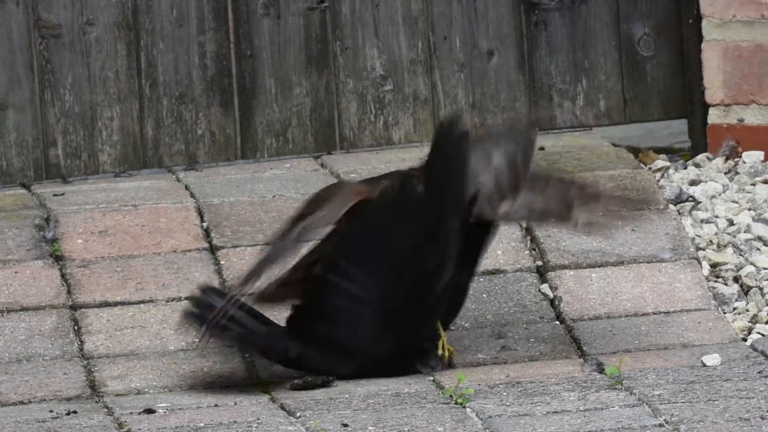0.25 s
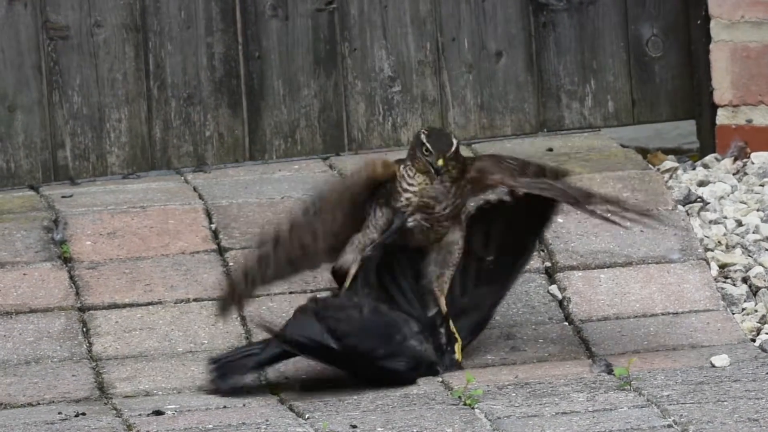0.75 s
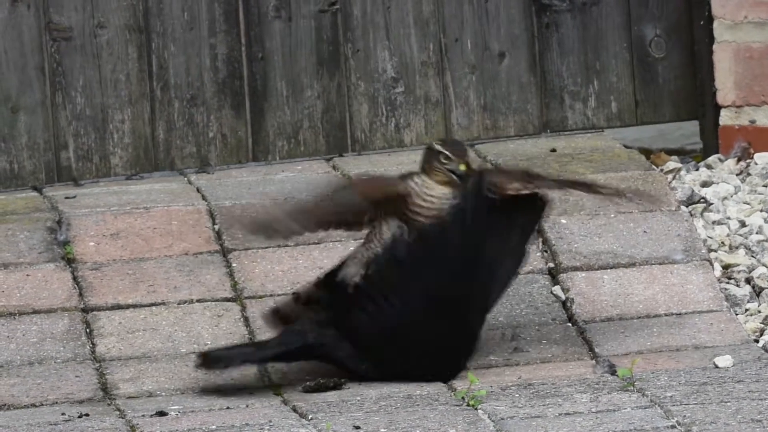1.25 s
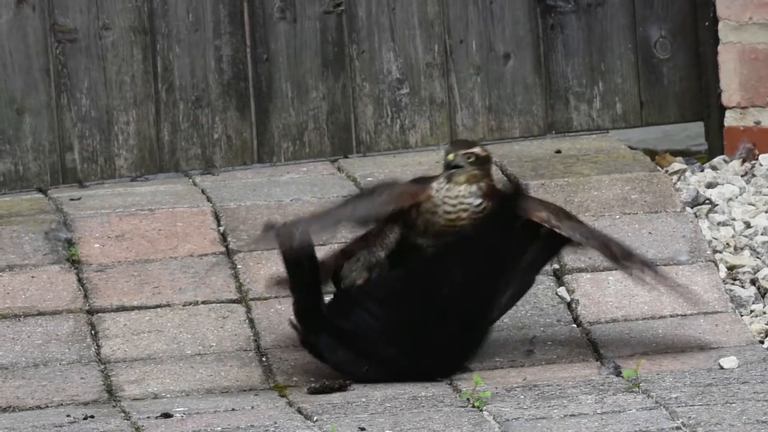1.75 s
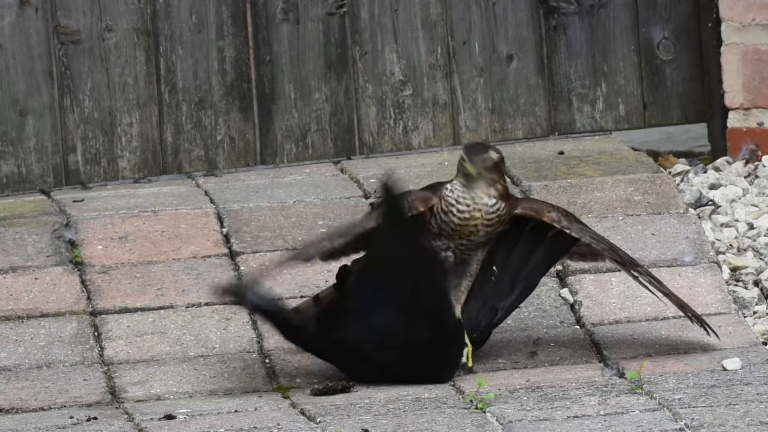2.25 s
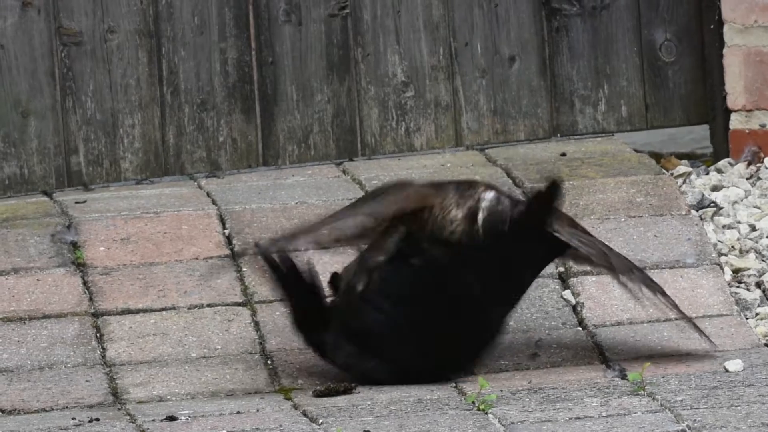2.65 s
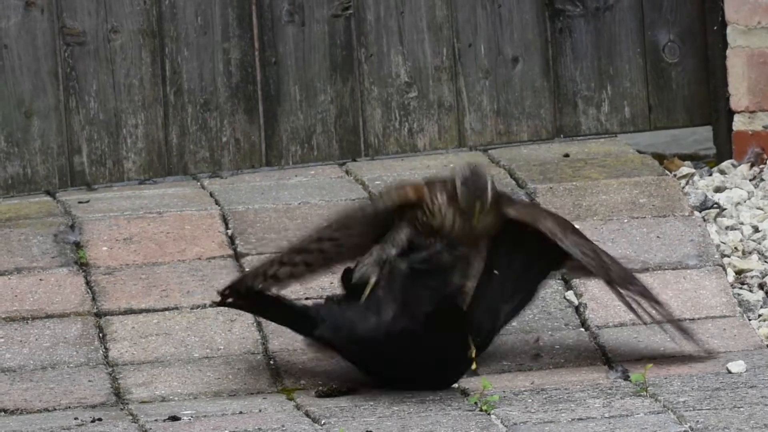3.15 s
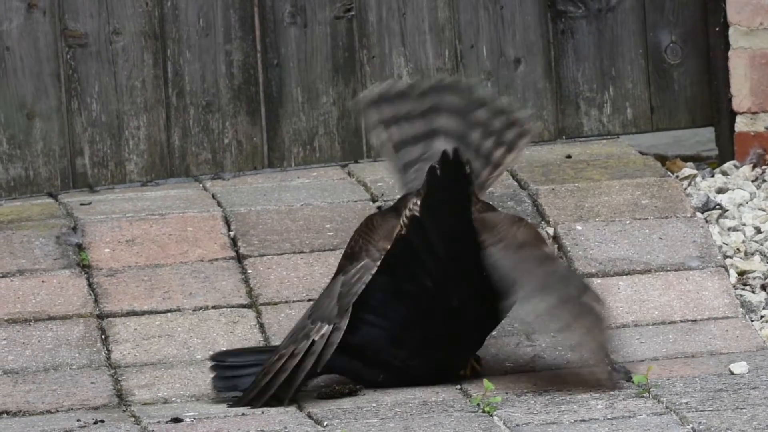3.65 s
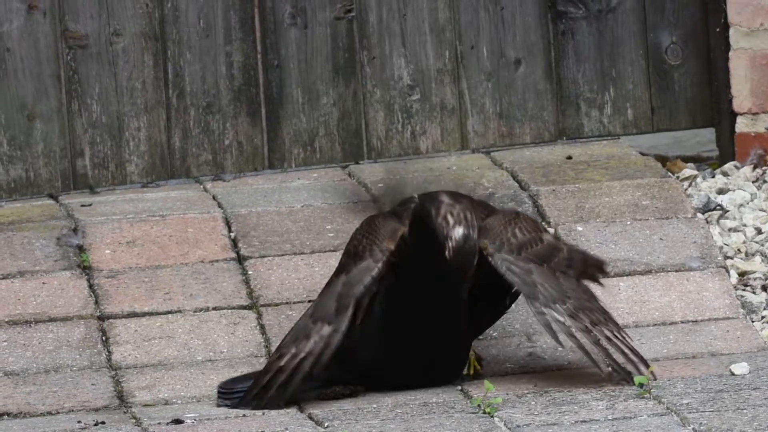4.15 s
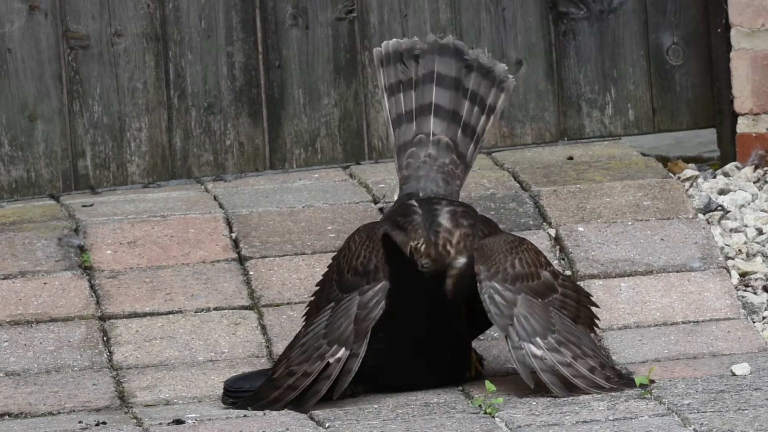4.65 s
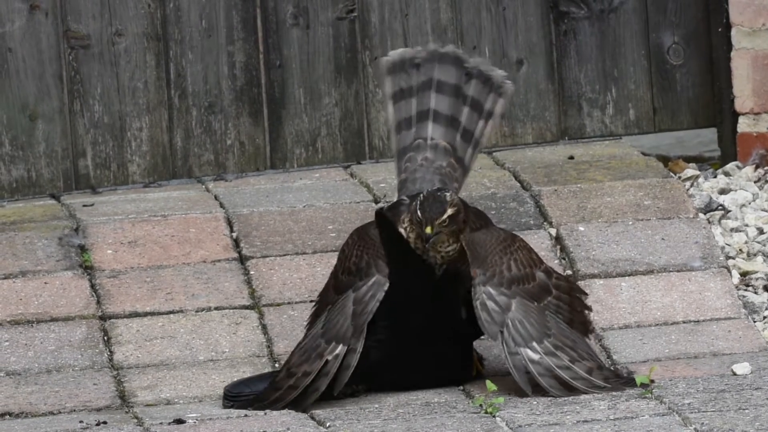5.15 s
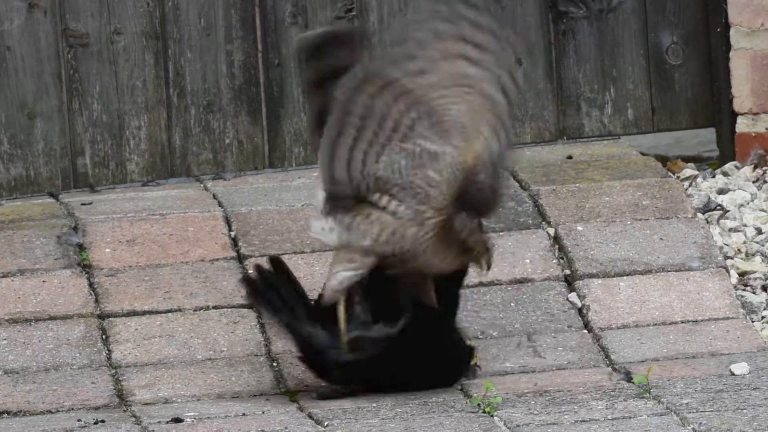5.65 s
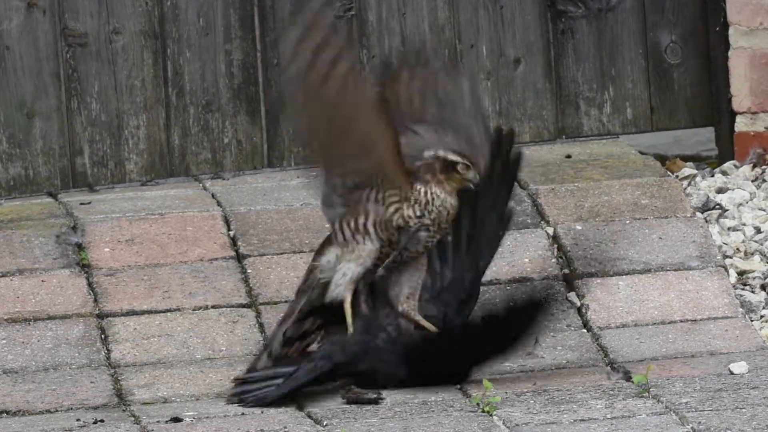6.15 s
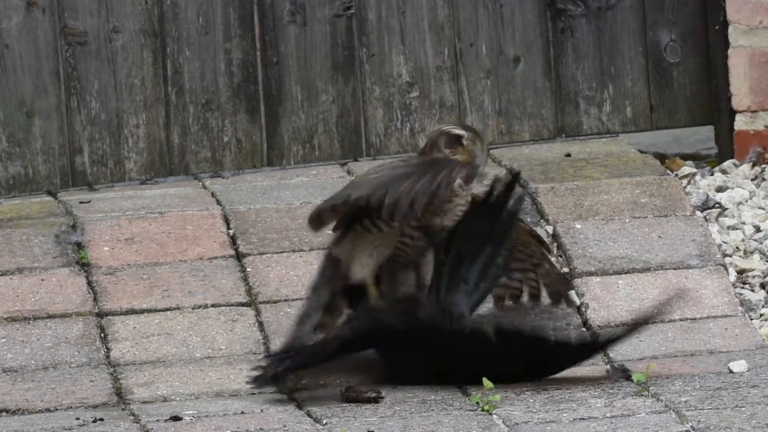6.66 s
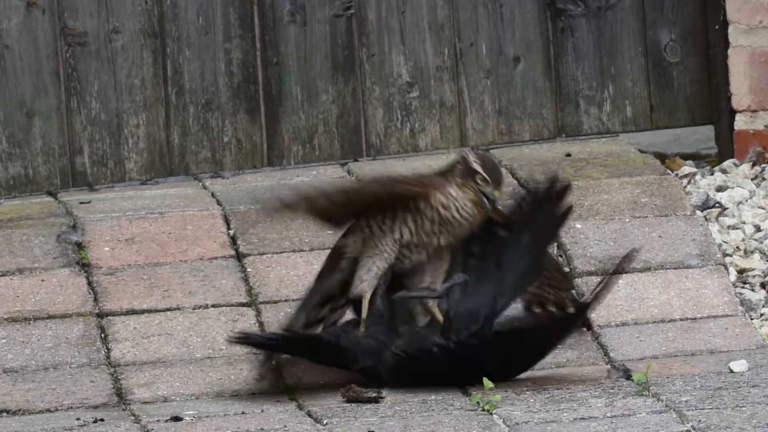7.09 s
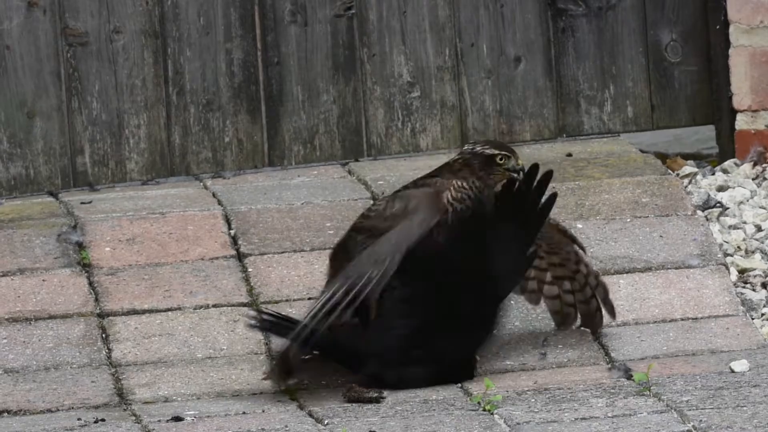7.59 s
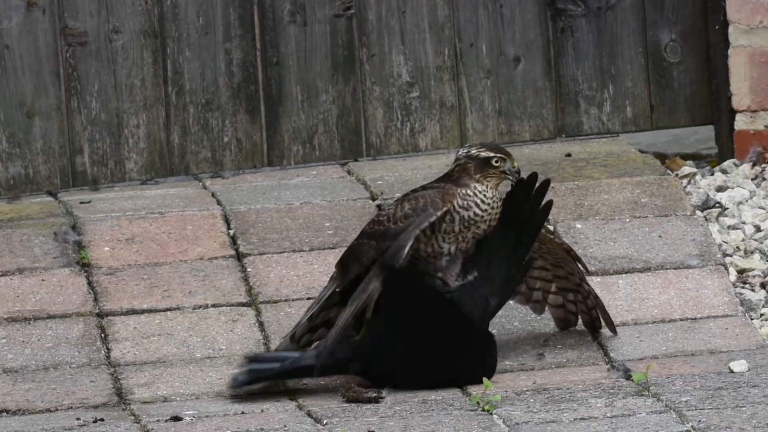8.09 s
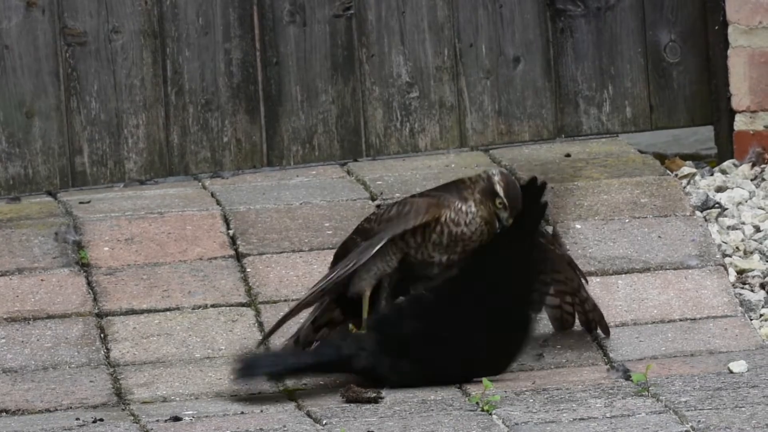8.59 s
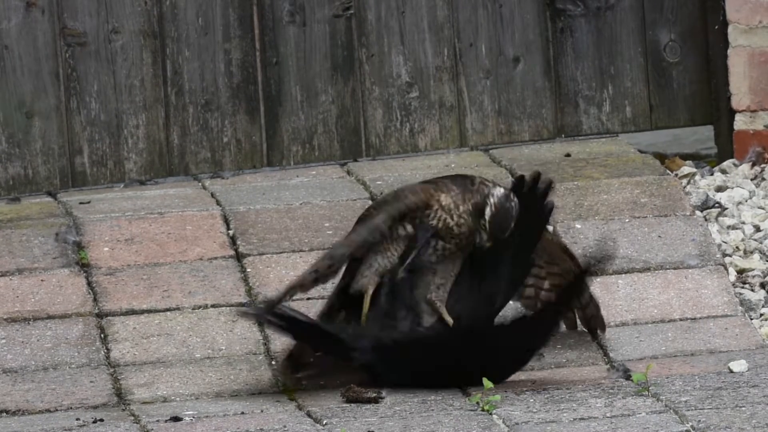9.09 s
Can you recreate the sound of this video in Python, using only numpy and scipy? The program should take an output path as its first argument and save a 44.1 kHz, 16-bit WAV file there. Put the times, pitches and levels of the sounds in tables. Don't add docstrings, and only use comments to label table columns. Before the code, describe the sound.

Hoarse, raspy bird screams repeat about twice a second with hard short echoes, over soft wing beats, faint claw ticks and low town hum.

```python
import sys
import numpy as np
from scipy import signal
from scipy.io import wavfile
from scipy.ndimage import uniform_filter1d

SR = 44100
rng = np.random.default_rng(int(sys.argv[2]) if len(sys.argv) > 2 else 0)


def to_linear_factor(level_db):
    exponent = np.asarray(level_db, float) / 20
    return 10 ** exponent


def generate_wav(signal):
    frames = np.transpose(np.atleast_2d(signal))
    scaled = np.clip(frames, -1, 1) * 32767
    pcm = np.round(scaled).astype(np.int16)
    wavfile.write(sys.argv[1], SR, pcm)


N = 411453

# (start [s], length [s], peak effort [dB], swell up to the peak [dB], open-beak brightness [dB])
CAWS = [(-.2, .22, -25, 6, -13), (.212, 0.23, -24.5, 3.5, -19), (.662, 0.23, -25, 5.5, -13),
        (1.125, 0.23, -24.5, 7, -22), (1.577, 0.24, -26.5, 2.5, -21), (2.079, 0.17, -28, 4, -28.5),
        (2.672, 0.251, -22.5, 7.5, -19), (3.172, 0.23, -21.5, 10.5, -18), (3.707, 0.17, -30, 0.5, -22),
        (4.11, 0.24, -25.5, 6.5, -19.5), (4.643, 0.17, -29, 13.5, -20.5), (5.057, 0.21, -26.5, 9.5, -17.5),
        (5.562, 0.23, -25, 7, -18.5), (5.979, 0.2346, -23.5, 7.5, -15.5), (6.439, .19, -27.5, 2, -25.5),
        (6.818, 0.24, -28, 1, -15), (7.265, 0.1976, -26, 5, -16.5), (7.707, .19, -27, 10, -21),
        (8.616, 0.13, -30, 4, -26), (8.943, 0.22, -24.5, 8.5, -19.5)]
# (hoarse rate [Hz], steady rate [Hz], steadies after [s], roughness then [0-1])
VOICE = [(350, 350, .1, .7), (315, 325, .14, .55), (360, 344, .13, .4), (330, 320, .13, .35),
         (298, 317, .16, .2), (288, 288, .12, .85), (348, 348, .13, .25), (288, 352, .1, .2),
         (288, 288, .1, .95), (300, 314, .16, .4), (285, 289, .1, .9), (288, 310, .155, .4),
         (300, 320, .125, .25), (282, 350, .1, .45), (302, 292, .15, .6), (295, 315, .05, .3),
         (285, 308, .11, .4), (290, 284, .15, .55), (350, 344, .06, .74), (286, 305, .135, .25)]
# (first [Hz], last [Hz])
GAPE = [(5000, 5050), (4840, 4620), (4640, 5100), (4930, 4720), (4800, 4370), (4700, 4725), (4920, 4450),
        (4560, 4790), (4848, 4500), (4520, 4600), (4424, 4460), (4377, 4620), (4010, 5100), (4614, 4600),
        (4620, 4660), (4670, 5150), (4650, 5100), (4620, 4780), (4610, 4800), (4560, 4760)]
# (frequency [Hz], width [Hz], level [dB], share of the beak brightness [0-1])
PIPE = [(940.5, 144, -4, 0.1), (1113.5, 45, -4, 0.09), (1331, 280, -4, 0.1), (1584, 82, -7, 0.02),
        (1743, 120, -6.5, 0), (2031, 250, 1.94, 0.31), (2361, 380, -4.5, 0.31), (3238, 1400, 3.5, 1.06)]
# (frequency [Hz], width [Hz], level [dB])
CHEST = (657.5, 230, -3.5)
# (factor on the beak resonance [1], width [Hz], level [dB], share of brightness [1], share of effort [1])
BEAK = [(1.001, 403, -1.5, 0.72, 0), (1.22, 1700, 8.5, 1.256, 1.9), (1.502, 595, -2, 1.1, 0.077),
        (2.0, 1300, -2.5, 1.12, 1.2), (2.8, 901.6, -10, 1.9, 1.8)]
# (frequency [Hz], time to fall 60 dB [s])
YARD_DECAY = [(400, 0.15), (1100, 0.18), (2000, 0.21), (4000, 0.15), (9000, 0.113)]
# (frequency [Hz], left-right likeness [1])
YARD_SAME = [(500, 1.05), (800, 1.0), (1400, .96), (5000, 0.806), (10000, 0.3)]
# (frequency [Hz], level per Hz [dB])
HUM = [(18, -57), (30, -34.5), (80, -48), (114, -13), (144, -31.5), (304, -29), (354, -17.5), (747, -24),
       (1310, -18), (2140, -26), (3070, -26), (4520, -27.5), (14000, -33.5)]
# (frequency [Hz], left-right likeness [1])
HUM_SAME = [(60, 0.9), (230, 0.77), (900, 0.74), (3500, 0.12), (13600, 0.01)]
# (time [s], level [dB])
ENGINE = [(0.0, -80.5), (0.31, -58), (1.01, -85.5), (1.17, -60), (1.45, -92.5), (2.41, -75.5),
          (3.009, -97.5), (3.14, -80), (4.551, -80.5), (4.78, -74), (5.19, -83.5), (7.22, -82.5),
          (7.38, -85), (9.33, -82.5)]
# (frequency [Hz], level re the drone [dB])
DRONE = [(116, -5.5), (226, 0.5)]
# (time [s], pitch [Hz], level [dB])
HIGH_COOS = [
    [(.15, 440, -88), (.186, 421, -29), (.214, 458, -27.5), (.45, 429.9, -29.5), (.48, 434, -38),
     (.53, 449, -22.5), (.59, 423.3, -38), (.63, 452.8, -27.5), (.72, 430, -52)],
    [(1.09, 366, -62), (1.128, 395, -31.5), (1.155, 455, -28.5), (1.19, 456.7, -31.5), (1.215, 421, -39),
     (1.245, 450, -37), (1.31, 445, -32), (1.38, 427, -75.5)],
]
# (time [s], pitch [Hz], level [dB])
LOW_COOS = [
    [(.56, 408, -34), (.6, 393.5, -34.5), (.7, 376, -30.5), (.74, 343, -43), (.76, 319, -37.5),
     (.81, 355, -41.5), (.89, 326, -56), (.93, 326, -75)],
    [(1.19, 406, -46), (1.215, 397, -36), (1.3, 402, -46.5), (1.36, 370, -67)],
]
# (time [s], peak [dB], ring [Hz], length [s])
TICKS = [
    (2.052, -44, 11100, 0.0038),
    (7.574, -58, 3052, 0.0067),
    (7.759, -52, 10720, 0.0056),
    (9.300, -57, 3890, 0.00716),
]
# (time [s], level [dB], centre [Hz])
FAR_CALLS = [
    [(2.25, -47, 1201), (2.36, -54.5, 1280), (2.47, -51, 1340), (2.57, -59, 1400), (2.7, -70, 1300)],
    [(7.93, -51, 1410), (7.97, -56.5, 1330), (8.15, -90, 1244)],
    [(8.3, -92, 1290), (8.334, -79, 1260), (8.448, -76.5, 1260), (8.58, -92, 1240)],
]

ATTACK_S, ATTACK_DB, EASE_S, EASE_DB, RELEASE_S, RELEASE_DB = 0.018, -11.5, 0.057, -5, 0.04, -44
HOARSE, HOARSE_END, SETTLE_S, GLIDE_S, SAG_S, SAG = 0.92, 0.9, 0.03, 0.045, 0.065, 0.12
OPEN_S, SHUT_DB, AJAR_DB, EASED_DB, CLOSING_DB = 0.1027, -36, -12.5, 0.5, -24.5
GAPE_FROM, GAPE_TO = 0.26, 0.75
CHEST_START_DB, CHEST_HELD_DB, CHEST_TOP_DB, CHEST_END_DB, CHEST_PER_EFFORT = -12, -22, -15, -12, -1.0
FULL_STRAIN_DB = -24.5
HUM_DB = -72.5


def evened(x):
    return x / np.sqrt(np.mean(x ** 2) + 1e-20)


def read(points, hz):
    f, value = np.transpose(points)
    return np.interp(np.log(hz + 1), np.log(f + 1), value)


def add(mix, s, sound):
    sound = sound[max(-round(s * SR), 0):]
    part = mix[max(round(s * SR), 0):][:len(sound)]
    part += sound[:len(part)]


def played(rows):
    s, *columns = np.transpose(rows)
    t = np.arange(s[0], s[-1], 1 / SR)
    return s[0], [np.interp(t, s, column) for column in columns]


def steep(x, hz, width):
    r = np.exp(-np.pi * 1.5 * width / SR)
    if np.ndim(hz) == 0:
        pole = r * np.exp(2j * np.pi * hz / SR)
        rung = signal.lfilter([(1 - r) ** 2], [1, -2 * pole, pole ** 2], x + 1e-18)
    else:
        turn = np.exp(2j * np.pi * np.cumsum(hz) / SR)
        rung = turn * signal.lfilter([(1 - r) ** 2], [1, -2 * r, r * r], x * turn.conj() + 1e-18)
    return 2 * rung.real / np.sqrt(width / 200)


def resonate(x, hz, width):
    return evened(steep(x, hz, width))


def wander(count, per_s):
    b, a = signal.butter(2, per_s, fs=SR / 16)
    slow = signal.lfilter(b, a, rng.standard_normal(count // 16 + 400))[398:]
    return np.interp(np.arange(count) / 16, np.arange(len(slow)), evened(slow))


def pair(frames, same):
    a, b, c, d = rng.standard_normal((frames, len(same), 4)).T
    same = np.clip(same, -1, 1)[:, None]
    left, other = a + 1j * b, c + 1j * d
    return np.array([left, same * left + np.sqrt(1 - same ** 2) * other])


def membrane(hz, rough, jitter, shimmer_db, hiss):
    chaos = np.clip(rough, 0, 1) ** 2
    drift = 0.009 * wander(len(hz), 30)
    uneven = jitter * chaos * np.clip(wander(len(hz), 160), -3, 3)
    turns = np.cumsum(hz * (1 + drift + uneven)) / SR
    limp = (-1) ** np.floor(turns) + 1.1 * rng.standard_normal(len(hz))
    slaps = np.diff(np.floor(turns), prepend=0) * to_linear_factor(shimmer_db * chaos * limp)
    puffs = (0.18 + np.exp(-(turns % 1) / 0.5)) * rng.standard_normal(len(hz))
    leak = 0.15 + hiss * chaos
    return (1 - hiss * chaos) * evened(slaps), evened(puffs) * leak


def gesture(start, length, peak_db, swell_db, open_db):
    held_db = CHEST_HELD_DB + CHEST_PER_EFFORT * (peak_db + 28.5)
    top_db = CHEST_TOP_DB + CHEST_PER_EFFORT * (peak_db + 28)
    low_db = peak_db - swell_db
    opened = min(OPEN_S, length - EASE_S - 0.01)
    climb = (opened - ATTACK_S) / (length - EASE_S - ATTACK_S)
    return [(start, low_db + ATTACK_DB, open_db + SHUT_DB, CHEST_START_DB),
            (start + ATTACK_S, low_db, open_db + AJAR_DB, held_db),
            (start + opened, peak_db - swell_db * (1 - climb), open_db, held_db),
            (start + length - EASE_S, peak_db, open_db, top_db),
            (start + length, peak_db + EASE_DB, open_db + EASED_DB, CHEST_END_DB),
            (start + length + RELEASE_S, peak_db + RELEASE_DB, open_db + CLOSING_DB, CHEST_END_DB)]


def voicing(t, length, hoarse_hz, steady_hz, steady_s, calm):
    sag = np.clip(1 + (t - length) / SAG_S, 0, 1.5)
    glide_hz = np.interp(t, [steady_s - GLIDE_S, steady_s + GLIDE_S], [hoarse_hz, steady_hz])
    rough = np.interp(t, [steady_s - SETTLE_S, steady_s, length - SETTLE_S, length],
                      [HOARSE, calm, calm, max(calm, HOARSE_END)])
    return glide_hz * (1 - SAG * sag ** 2), rough


def caw(push, throat, gape_hz):
    s, (effort_db, bright_db, chest_db) = played(gesture(*push))
    count, length = len(effort_db), push[1]
    t = np.arange(count) / SR
    hz, rough = voicing(t, length, *throat)
    slaps, puffs = membrane(hz, rough, jitter=0.13, shimmer_db=4.0, hiss=0.5)

    chest_hz, chest_width, chest_level_db = CHEST
    voice = to_linear_factor(chest_db + chest_level_db + 12.5) * steep(slaps + puffs, chest_hz, chest_width)
    for k, (f, width, db, share) in enumerate(PIPE):
        sway_db = 2.2 * wander(count, 18)
        level_db = db + share * (bright_db + 4.0) + sway_db
        voice += (-1) ** k * to_linear_factor(level_db) * steep(slaps + puffs, f, width)
    voice = signal.sosfilt(signal.butter(2, 3900, fs=SR, output="sos"), voice)

    beak_hz = np.interp(t, [GAPE_FROM * length, GAPE_TO * length], gape_hz)
    beak_hz = uniform_filter1d(beak_hz, 2500)
    strain_db = np.minimum(effort_db, FULL_STRAIN_DB) + 24.0
    breath = 0.91 * slaps + 2 * puffs
    for factor, width, db, share, strain in BEAK:
        gusts = to_linear_factor(2.33 * wander(count, 14.1))
        level_db = db + share * (bright_db + 4.5) + strain * strain_db
        voice += to_linear_factor(level_db) * gusts * steep(breath, np.minimum(factor * beak_hz, 14000), width)

    flutter = to_linear_factor(1.2 * wander(count, 35))
    onset = np.minimum(1, (t + 0.001) / 0.0029)
    voice *= to_linear_factor(effort_db + 15.0) * flutter * onset
    return s, signal.sosfilt(signal.butter(6, 470, "high", fs=SR, output="sos"), voice)


def yard(x):
    hz, t = np.fft.rfftfreq(256, 1 / SR), np.arange(400) * 64 / SR
    decay_s = np.maximum(read(YARD_DECAY, hz), 0.03)[:, None]
    z = pair(len(t), read(YARD_SAME, hz)) * to_linear_factor(-60 * t / decay_s)
    tail = signal.istft(z, nperseg=256, noverlap=192)[1]
    tail = np.pad(tail, ((0, 0), (130, 0)))
    return signal.fftconvolve(x[None], tail / np.linalg.norm(tail[0]), axes=1)[:, :N]


def rustle(screams):
    struggle = np.sqrt(abs(uniform_filter1d(screams ** 2, 16000)))
    whoosh = resonate(steep(rng.standard_normal(N), 380, 330), 300, 540)
    murmur = resonate(rng.standard_normal(N), 440 + 60 * wander(N, 1.5), 58)
    lumps = to_linear_factor(2.5 * wander(N, 12))
    murmur_level = to_linear_factor(-75.0 + 3.0 * wander(N, 2.7))
    return lumps * (to_linear_factor(-34.5) * struggle * whoosh + murmur_level * murmur)


def town():
    frames, hz = N // 256 + 5, np.fft.rfftfreq(1024, 1 / SR)
    patches = uniform_filter1d(rng.standard_normal((frames, 513)).T, 6, 0)
    patches = evened(uniform_filter1d(patches, 12, 1))
    z = pair(frames, read(HUM_SAME, hz)) * to_linear_factor(read(HUM, hz)[:, None] + 2.0 * patches)
    hum = to_linear_factor(HUM_DB) * evened(signal.istft(z, nperseg=1024, noverlap=768)[1][:, :N])
    engine_db = np.interp(np.arange(N) / SR, *np.transpose(ENGINE))
    drone = sum(to_linear_factor(db) * resonate(rng.standard_normal(N), f, 20) for f, db in DRONE)
    return hum + to_linear_factor(engine_db) * drone


def coo(rows):
    s, (hz, level_db) = played(rows)
    unsteady_hz = hz * (1 + 0.0044 * wander(len(hz), 36))
    tone = np.sin(2 * np.pi * np.cumsum(unsteady_hz) / SR)
    quaver = to_linear_factor(1.5 * wander(len(hz), 30))
    return s, to_linear_factor(level_db + 3.5) * quaver * tone * signal.windows.tukey(len(hz), 0.1)


def tick(s, db, hz, length):
    count = round(max(length, 0.002) * SR)
    width = 0.21 * hz
    ring = resonate(resonate(rng.standard_normal(count), hz, width), hz, width)
    return s, to_linear_factor(db) * np.hanning(count) * ring


def far_crow(rows):
    s, (level_db, hz) = played(rows)
    slaps, puffs = membrane(0 * hz + 330, 0.92, jitter=0.1, shimmer_db=7.0, hiss=0.23)
    voice = steep(steep(slaps + puffs, hz, 300), hz, 500)
    return s, to_linear_factor(level_db) * evened(voice) * signal.windows.tukey(len(hz), 0.2)


def scene():
    near, dove, claws, far = np.zeros((4, N))
    for push, throat, gape_hz in zip(CAWS, VOICE, GAPE):
        add(near, *caw(push, throat, gape_hz))
    for rows in HIGH_COOS + LOW_COOS:
        add(dove, *coo(rows))
    for row in TICKS:
        add(claws, *tick(*row))
    for rows in FAR_CALLS:
        add(far, *far_crow(rows))
    echoes = yard(to_linear_factor(-1.5) * near + to_linear_factor(-10.5) * dove + to_linear_factor(-5) * far + to_linear_factor(-8) * claws)
    direct = to_linear_factor(-1) * near + dove + to_linear_factor(-6) * far + claws + rustle(near)
    balance = to_linear_factor(np.array([[0.15], [-0.15]]))
    return balance * (direct + echoes) + town()


def roll_off(x):
    return signal.sosfilt(signal.butter(12, 14160, fs=SR, output="sos"), x)


def record(dry):
    heard = signal.sosfilt(signal.butter(2, [70, 11000], "band", fs=SR, output="sos"), dry)
    return roll_off(heard)


dry = scene()
out = record(dry)
generate_wav(out)
```